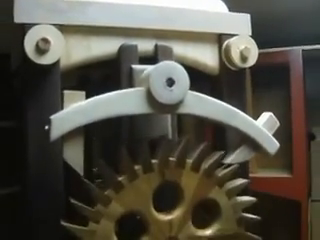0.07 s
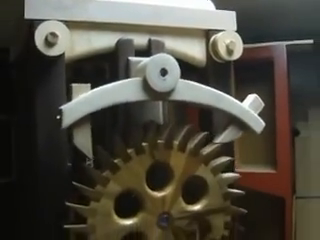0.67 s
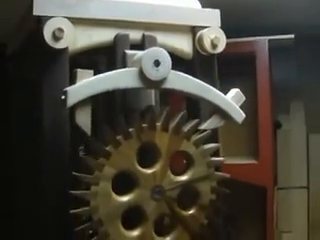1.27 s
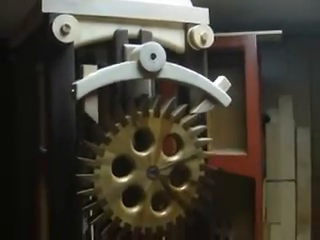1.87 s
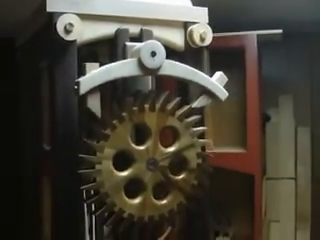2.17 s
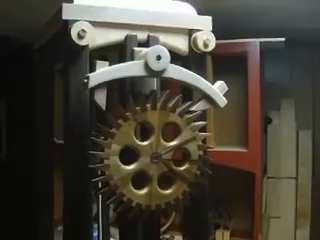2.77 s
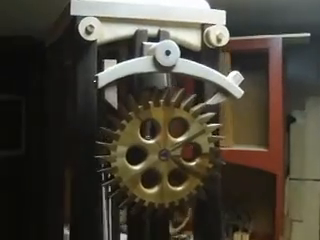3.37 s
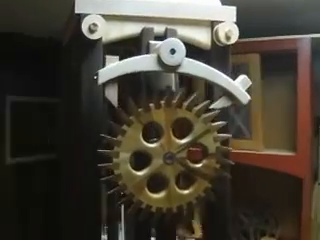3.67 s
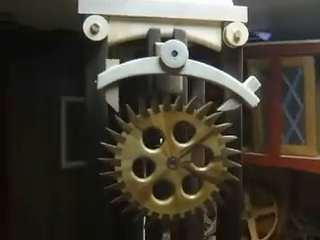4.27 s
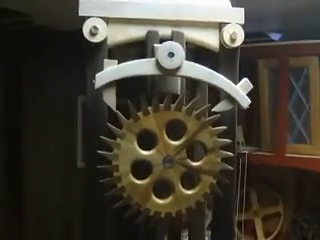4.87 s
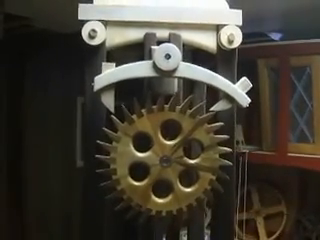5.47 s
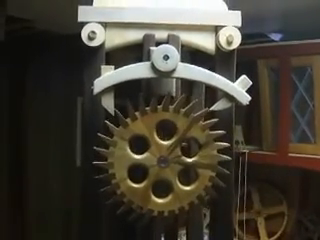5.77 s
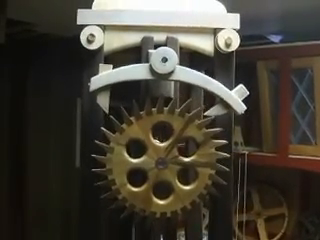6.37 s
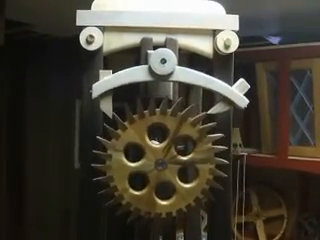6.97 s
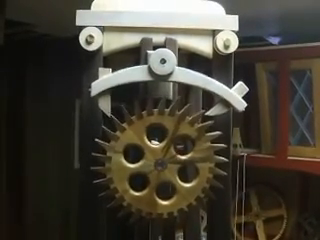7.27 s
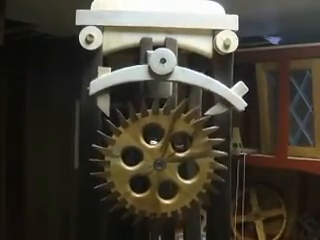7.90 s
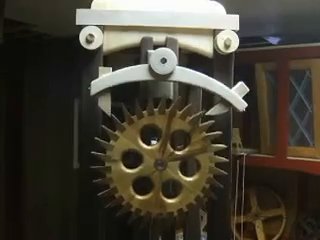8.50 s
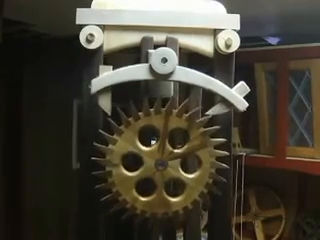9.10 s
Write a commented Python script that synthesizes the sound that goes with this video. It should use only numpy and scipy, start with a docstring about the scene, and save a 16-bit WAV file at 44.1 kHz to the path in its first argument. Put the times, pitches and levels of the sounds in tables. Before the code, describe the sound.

Tick, clunk, tock: a big mechanical clock repeats this even pattern about eight times. The ticks and tocks are short, metallic and slightly bouncing, while the clunks are louder and lower, with a brief ring and small-room echo. One dry snap comes early, then a few faint rustles as the nearby microphone backs away and settles. Soft hiss and low rumble lie underneath.

```python
"""In a small quiet room, a large clock goes tick, clunk, tock.
The teeth of its brass wheel land in turn on the two pallets (catches) of a rocker, each with a short
bouncing tick. Once a swing a heavy clunk follows and rings the frame. The listener backs away, moves
round and comes to rest. Beneath lie room rumble, dull thuds, a few rubs and snaps, and 8-bit hiss."""
import sys
import numpy as np
from scipy import signal
from scipy.fft import rfft, irfft
from scipy.io import wavfile

SR = 44100
rng = np.random.default_rng(int(sys.argv[2]) if len(sys.argv) > 2 else 0)


def materialize(psi):
    """Save the field psi as 16-bit PCM at rate SR to the path in sys.argv[1].

    A 1-D psi becomes a single channel; in a 2-D psi each row is a channel.
    """
    bounded = np.clip(np.atleast_2d(psi).T, -1, 1)
    quanta = np.round(bounded * 32767).astype(np.int16)
    wavfile.write(sys.argv[1], SR, quanta)


N = 407484
RING_SIZE = 16384  # samples in one strike
AGE = np.arange(RING_SIZE) / SR  # time since the strike [s]


def amp(db):
    """Turns decibels into a gain."""
    return 10 ** (np.asarray(db) / 20)

def unit(x):
    """Scales a sound to an average strength (rms) of 1."""
    return x / np.sqrt(np.mean(x ** 2) + 1e-20)

def burst(x):
    """Scales a short sound to the energy of one millisecond at strength 1."""
    return x / np.sqrt(np.sum(x ** 2) * 1000 / SR + 1e-20)

def read(points, hz):
    """Looks up a pitch in a table, sliding between rows on a musical (log) scale."""
    pitches, values = np.transpose(points)
    return np.interp(np.log(hz + 1), np.log(pitches + 1), values)

def add(mix, s, sound):
    """Mixes a sound in at s seconds."""
    part = mix[max(round(s * SR), 0):][:len(sound)]
    part += sound[:len(part)]

def colour(x, points):
    """Makes some pitches louder and others softer."""
    gain = amp(read(points, np.fft.rfftfreq(len(x), 1 / SR)))
    return irfft(rfft(x) * gain, len(x))

def swell(hz, rise_s):
    """Sound builds as a blow spreads; bending waves carry bass more slowly than treble."""
    return 1 - np.exp(-(AGE / rise_s) ** 2 * hz / 1000)

def ring(notes, rise_s, stretch):
    """A struck part's notes swell, then fade 60 dB in their base fade time multiplied by stretch."""
    sound = np.zeros(RING_SIZE)
    for k, (hz, db, fade_s) in enumerate(notes):
        envelope = swell(hz, rise_s) * amp(db - 60 * AGE / (fade_s * stretch))
        sound += (-1) ** k * envelope * np.sin(2 * np.pi * hz * AGE)  # neighbours swing opposite ways
    return burst(sound)

def click(points):
    """The shortest click that has this tone colour."""
    log_gain = np.log(amp(read(points, abs(np.fft.fftfreq(RING_SIZE, 1 / SR)))))
    spectrum = np.exp(np.conj(signal.hilbert(log_gain)))  # packs the energy at the start
    return burst(np.fft.ifft(spectrum).real)

def contact(points, scrape_s, grit):
    """A blow, then tiny slips as the parts settle together."""
    slips = rng.standard_normal(RING_SIZE) * np.exp(-AGE / scrape_s)
    slips *= grit / np.linalg.norm(slips)
    slips[0] += 1  # the blow itself
    return burst(signal.fftconvolve(click(points), slips)[:RING_SIZE])


# tone colours of the rumble and the hiss: (pitch [Hz], relative level [dB])
RUMBLE_COLOUR = [(10, -7), (28, -9), (48, -8.5), (62, 0), (95, -6.5), (130, -3), (180, -3.5), (255, -0.5),
                 (400, -2), (560, -6.5), (720, -7.5), (1050, -12), (1450, -19.5), (2300, -63)]
HISS_COLOUR = [(500, -16), (1500, -0.5), (3000, -2.5), (5500, -3), (8000, -7.5), (9000, -24)]
# thin steady tones: (pitch [Hz], level [dB])
WHINE_TONES = [(1471, -72), (5160, -75), (7859, -65), (7889, -67)]

def background():
    """Low room rumble, faint microphone hiss and a few thin tones."""
    rumble = amp(-52) * unit(colour(rng.standard_normal(N), RUMBLE_COLOUR))
    hiss = amp(-57.5) * unit(colour(rng.standard_normal(N), HISS_COLOUR))
    t = np.arange(N) / SR
    whine = sum(np.sqrt(2) * amp(db) * np.sin(2 * np.pi * hz * t) for hz, db in WHINE_TONES)
    return rumble + hiss + whine

def thuds(pitch_hz=133.5, length_s=.17, first_s=.41, every_s=2.0, gap_s=.19):
    """A low note swells in dull, regular pairs, half hidden in the rumble."""
    out, window = np.zeros(N), np.hanning(int(length_s * SR))
    thud = amp(-52.5) * np.sin(2 * np.pi * pitch_hz * np.arange(len(window)) / SR) * window
    for s in np.arange(first_s, N / SR, every_s):
        add(out, s - length_s / 2, thud)
        add(out, s + gap_s - length_s / 2, thud)
    return out


# faint rubs: (time [s], length [s], level [dB], strongest pitch [Hz])
RUB_EVENTS = [(3.235, .13, -52.5, 1770), (3.462, 0.11, -47, 4250), (4.849, 0.043, -46.5, 2140)]

def rubs():
    """Soft, brief rustles: noise that fades in and out."""
    out = np.zeros(N)
    for s, length, db, hz in RUB_EVENTS:
        shape = [(hz / 5, -16), (hz, 0), (hz * 1.75, -4), (10000, -30)]
        noise = unit(colour(rng.standard_normal(RING_SIZE), shape))
        window = np.hanning(int(length * SR))
        add(out, s, amp(db) * noise[:len(window)] * window)
    return out


# dry snaps: (time [s], relative level [dB])
SNAP_EVENTS = [(1.6995, -11), (4.972, -31.5)]
# notes of the part that snaps: (pitch [Hz], relative level [dB], base fade time [s])
SNAP_NOTES = [(2690, 5, 0.0047), (3310, -1, 0.0088), (4100, -0.5, 0.005), (6570, -19.5, 0.01),
              (7600, -20, 0.011)]
# tone colour of its first crack: (pitch [Hz], relative level [dB])
SNAP_COLOUR = [(200, -7), (1200, -1), (2600, -2), (4200, 2.5), (5500, -3), (8200, -18), (10200, -44)]

def snaps():
    """A small hard part clicks, too close for any room echo."""
    crack = amp(-6.5) * contact(SNAP_COLOUR, scrape_s=.00044, grit=.34)
    snap = crack + ring(SNAP_NOTES, rise_s=.0035, stretch=.66)
    out = np.zeros(N)
    for s, db in SNAP_EVENTS:
        add(out, s, amp(db - 6) * snap)
    return out


# the listener's path: (time [s], closeness [0-1], distance to the side [0-1])
LISTENER_PATH = [(0, 0.99, 1), (1.5, 0.87, 0.91), (2.75, 0.03, 1), (5.0, 0, 0)]

def listener(s):
    """How close the listener is to the clock, and how far to the side of the resting place."""
    times, close, aside = np.transpose(LISTENER_PATH)
    return np.interp(s, times, close), np.interp(s, times, aside)

def reflections():
    """A crowd of random echoes, evened out over time and pitch."""
    noise = rng.standard_normal(RING_SIZE)
    for size in (1024, 512, 1024, 512):
        slices = signal.stft(noise, nperseg=size)[2]
        noise = signal.istft(slices / (abs(slices) + 1e-12), nperseg=size)[1][:RING_SIZE]
    return unit(noise)

def echoes_at(s, resting, fresh):
    """The echo pattern shifts while the listener moves; at rest only a small fresh share changes."""
    share = np.clip(fresh + np.mean(listener(s)), 0, 1)
    return np.sqrt(1 - share) * resting + np.sqrt(share) * reflections()


# how echoes die away in the case and room: (pitch [Hz], base fade time [s])
ROOM_FADES = [(200, 0.24), (650, 0.31), (1300, 0.3), (2300, 0.27), (4000, 0.14), (8000, 0.19)]

def room_tail(echoes, points, rise_s, stretch):
    """Case and room scatter the sound: bass swells later and lasts longer than treble."""
    hz, spectrum = np.fft.rfftfreq(RING_SIZE, 1 / SR), rfft(colour(echoes, points))
    centres, out = [centre for centre, _ in ROOM_FADES], 0
    for (centre, fade_s), weights in zip(ROOM_FADES, np.eye(len(ROOM_FADES))):
        band = irfft(spectrum * read(list(zip(centres, weights)), hz))
        envelope = swell(centre, rise_s) * amp(-60 * AGE / (fade_s * stretch))
        out = out + band * unit(envelope)
    return burst(out)

def brighten(x, treble_db, corner_hz):
    """Turns the treble up or down; a harder hit has more of it."""
    low = signal.lfilter(*signal.butter(1, corner_hz, fs=SR), x)
    return low + amp(treble_db) * (x - low)

def ticks(landings, crack_colour, echo_colour, metal, bounces, *, level_db, treble_db,
          ring_aside_db, crack_db, echo_db, echo_rise_s, stretch, scrape_s):
    """A tooth hits a pallet, rings the metal and bounces: (delay [s], relative level [dB])."""
    out, resting = np.zeros(N), reflections()
    hardness = 2.5  # dB of extra treble per dB of force
    for s, force_db, bounce_db in landings:
        crack = contact(crack_colour, scrape_s, grit=5.2)
        for delay_s, drop_db in bounces:
            add(crack, delay_s, amp(bounce_db + drop_db) * contact(crack_colour, scrape_s, grit=2.8))
        room = room_tail(echoes_at(s, resting, fresh=.096), echo_colour, echo_rise_s, stretch)
        _, aside = listener(s)
        ringing = amp(ring_aside_db * aside) * metal  # depends on the side it is heard from
        tick = ringing + amp(force_db) * (amp(crack_db) * crack + amp(echo_db) * room)
        add(out, s, amp(level_db) * brighten(tick, treble_db + hardness * force_db, corner_hz=3600))
    return out


# teeth landing on the exit pallet: (time [s], force [dB], bounce strength [dB])
EXIT_LANDINGS = [(0.9393, 1.5, -11), (2.171, 1.2, -7), (3.3657, 0.5, 0), (4.6229, -0.9, -6),
                 (5.8571, 0.7, -7), (7.0404, 1.05, 3), (8.2581, -0.7, -4)]
# notes of wheel and rocker: (pitch [Hz], relative level [dB], base fade time [s])
EXIT_NOTES = [(651, -3.5, 0.33), (1074, -4.5, 0.16), (1770, -3.5, 0.052), (2206, 0.5, 0.085),
              (2925, -13, 0.26), (3590, -14.5, 0.18), (4310, -13, 0.16), (5750, -7, .11),
              (6480, -13.5, 0.081)]
# tone colours of the crack and its echo: (pitch [Hz], relative level [dB])
EXIT_COLOUR = [(300, -4), (1000, -15.5), (2100, 1.5), (3000, -13), (4200, -8), (5000, -9), (6300, 2.5),
               (7400, -2), (9000, -15)]
EXIT_ECHO = [(120, -56), (200, -8), (282, -1), (418, -2), (629, -1), (932, -0.5), (1080, -3), (1380, -12.5),
             (1820, -5), (3290, -8.5), (4340, -6.5), (5110, -14.5), (6020, -12), (8080, -15.5),
             (10000, -73), (13000, -84), (22000, -120)]

def exit_tocks():
    """The duller tock: a tooth lands on the exit pallet and bounces twice."""
    metal = amp(-1) * ring(EXIT_NOTES, rise_s=.0044, stretch=.73)
    return ticks(EXIT_LANDINGS, EXIT_COLOUR, EXIT_ECHO, metal, bounces=[(.0142, -5.5), (.0265, -6.5)],
                 level_db=-25.5, treble_db=-6.5, ring_aside_db=-2.5, crack_db=-2,
                 echo_db=0, echo_rise_s=.012, stretch=.81, scrape_s=.0036)


# teeth landing on the entry pallet: (time [s], force [dB], bounce strength [dB])
ENTRY_LANDINGS = [(0.163, 1.16, 2.5), (1.3768, 0.87, -11.5), (2.5945, 1.1, -8), (3.8092, -0.1, -9),
                  (5.0394, 0.1, -21), (6.2826, -.2, 0), (7.5068, 0.6, -2.5), (8.7435, -1.3, 3)]
# notes of wheel and rocker: (pitch [Hz], relative level [dB], base fade time [s])
ENTRY_NOTES = [(526.7, -7, 0.54), (763, 1.5, 0.28), (926, -7.5, 0.31), (1099, 1, .15), (1490, -2.5, 0.18),
               (2030, 0, 0.14), (2325, -10.5, .2), (3400, -13.5, 0.18), (3417, -3.5, .18),
               (6010, -0.5, 0.074), (6170, -3, 0.03), (7500, -4.5, 0.055)]
# tone colours of the crack and its echo: (pitch [Hz], relative level [dB])
ENTRY_COLOUR = [(300, -2.5), (1000, -6), (2200, 1.5), (2800, 1), (3400, -3.5), (4500, -10.5), (6200, -1.5),
                (7200, 0.5), (7900, 6.5), (9000, -7.5)]
ENTRY_ECHO = [(120, -48), (200, -7), (391, -9.5), (778, -2.5), (917, -7.5), (1080, -3), (1340, -21),
              (1500, -13.5), (2150, -8.5), (3130, -14.5), (3450, -13), (4270, -21), (6020, -18),
              (7950, -15), (10000, -54.5), (13000, -74), (22000, -120)]

def entry_ticks():
    """The brighter tick: a tooth lands on the entry pallet and bounces once."""
    metal = amp(-3.5) * ring(ENTRY_NOTES, rise_s=.0053, stretch=.95)
    return ticks(ENTRY_LANDINGS, ENTRY_COLOUR, ENTRY_ECHO, metal, bounces=[(.0092, -.49)],
                 level_db=-23, treble_db=.5, ring_aside_db=2.5, crack_db=-6,
                 echo_db=-1, echo_rise_s=.013, stretch=.89, scrape_s=.0039)

def emphasise(x, db, centre_hz, width_hz):
    """Turns one band of pitches up or down."""
    band = signal.lfilter(*signal.iirpeak(centre_hz, centre_hz / width_hz, fs=SR), x)
    return x + (amp(db) - 1) * band


# heavy strokes, each just after an entry tick: (time [s])
CLUNK_TIMES = [0.3409, 1.563, 2.7668, 3.99, 5.2244, 6.453, 7.676, 8.895]
# notes of the struck lever and the frame: (pitch [Hz], relative level [dB], base fade time [s])
LEVER_NOTES = [(622, -8, .014), (980, 3.5, 0.026), (1262.5, 4, 0.02), (1772, -6.5, 0.036),
               (2140, -11, 0.03), (2367, -11, 0.024), (3220, -31, 0.0093)]
FRAME_NOTES = [(309, -15, 0.29), (417.7, -10.5, 0.15), (622, -10.5, 0.32), (659, -13.5, 0.33),
               (657.3, 5.5, .235), (778, -24, 0.56), (852, -12, 0.32), (911, -25.5, .35), (1021, -14, .2),
               (1150, -5.5, 0.077), (1219, -12, 0.098), (1291, -10, .3), (1360, -22, 0.32),
               (1550, -40, 0.44), (1827, -20.5, 0.087), (1890, -16.5, 0.13), (1967, -18.5, 0.26),
               (2105, -16.5, .15), (2394, -13, 0.15)]
# tone colour of the clunk's echo: (pitch [Hz], relative level [dB])
CLUNK_ECHO = [(100, -32.5), (200, -13.5), (310, -6), (450, -16), (640, 8.5), (800, -2.5), (1040, -6),
              (1300, -2.5), (1550, -11.5), (2300, -13.5), (2740, -19), (3300, -20.5), (5000, -42.5),
              (9000, -60)]

def clunks():
    """Once a swing, the same heavy blow knocks the lever, rings the frame and echoes in the room."""
    out, resting = np.zeros(N), reflections()
    frame = ring(FRAME_NOTES, rise_s=.0065, stretch=.9)
    knock = ring(LEVER_NOTES, rise_s=.00097, stretch=.99)
    for s in CLUNK_TIMES:
        close, aside = listener(s)
        db = -14.5 + 1.2 * close
        room = room_tail(echoes_at(s, resting, fresh=.03), CLUNK_ECHO, rise_s=.0021, stretch=.93)
        clunk = amp(-2.4) * knock + amp(3) * frame + amp(1) * room
        # the frame's main and upper ring change with where the listener stands
        clunk = emphasise(clunk, -.9 - 6.5 * aside, centre_hz=658.5, width_hz=58)
        clunk = emphasise(clunk, 2 - 3 * close, centre_hz=1250, width_hz=310)
        add(out, s, amp(db) * brighten(clunk, treble_db=.5, corner_hz=1510))
        add(out, s - .0016, amp(db - 20) * knock)  # a light touch just before the lever lands
    return out

def scene():
    """Tick, clunk, tock over the quiet room, in one channel."""
    clock = entry_ticks() + exit_tocks() + clunks()
    return (clock + snaps() + rubs() + thuds() + background())[None]

def record(dry):
    """Rounding to coarse 8-bit steps adds gritty hiss; filters smooth it and cut the top treble."""
    rate_hz, step = 16000, 1 / 128
    sampled = signal.resample_poly(dry, rate_hz, SR, axis=1)
    stepped = step * np.floor(sampled / step + .06)
    smoothing = signal.firwin(6175, 8130, window=("kaiser", 7), fs=np.lcm(SR, rate_hz))
    smoothed = signal.resample_poly(stepped, SR, rate_hz, axis=1, window=smoothing)[:, :N]
    treble_cut = signal.firwin(511, 10200, window=("kaiser", 9), fs=SR)
    return signal.oaconvolve(smoothed, treble_cut[None], "same")


dry = scene()
out = record(dry)
materialize(out)
```